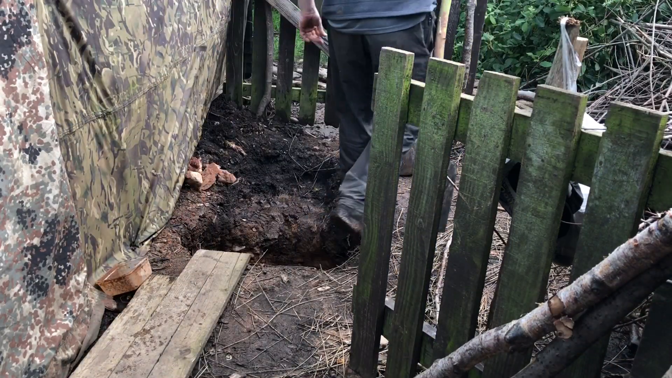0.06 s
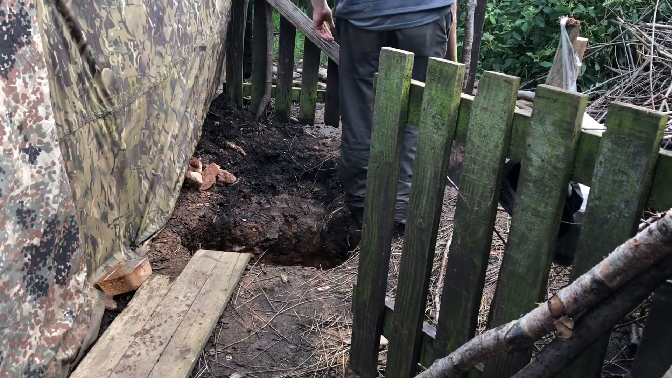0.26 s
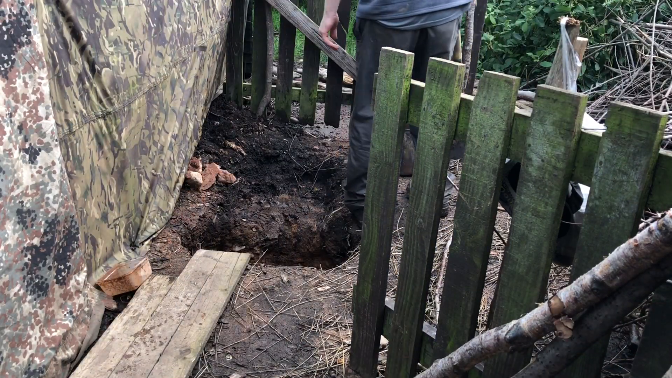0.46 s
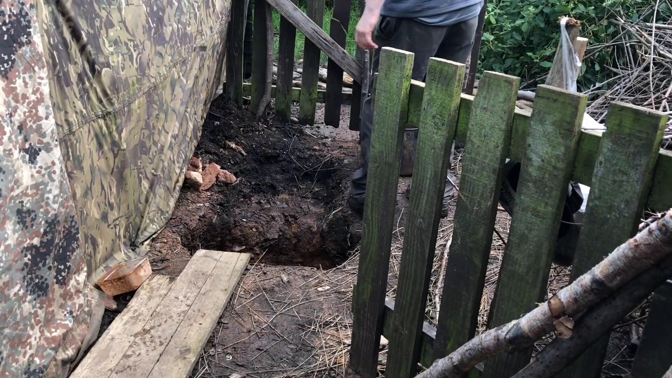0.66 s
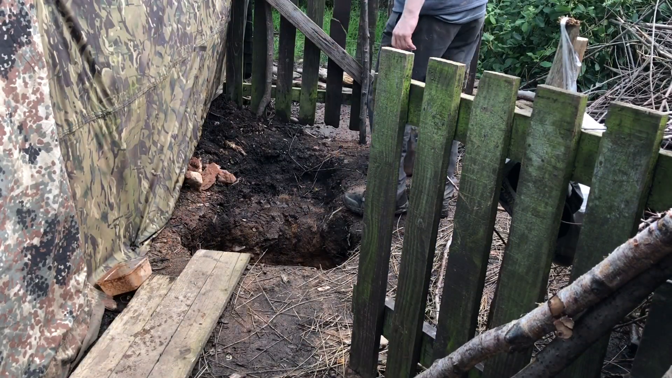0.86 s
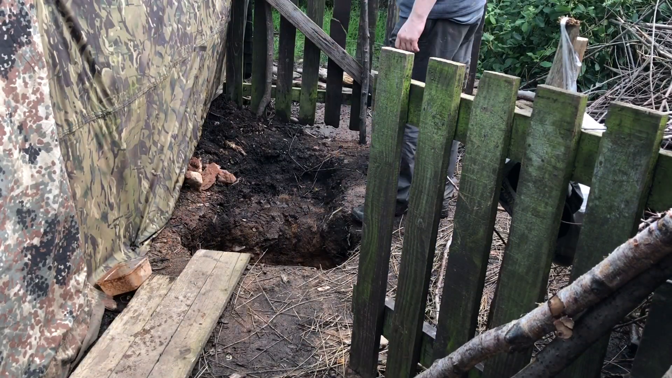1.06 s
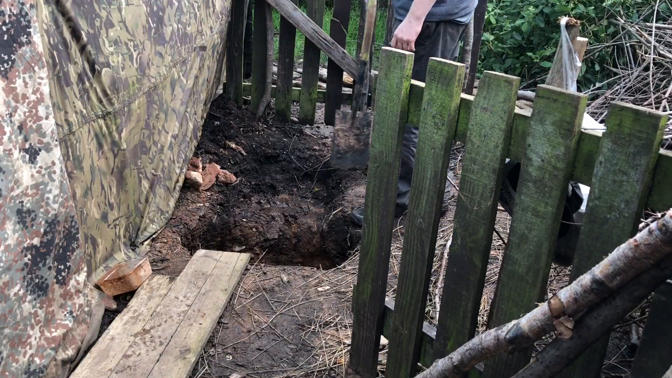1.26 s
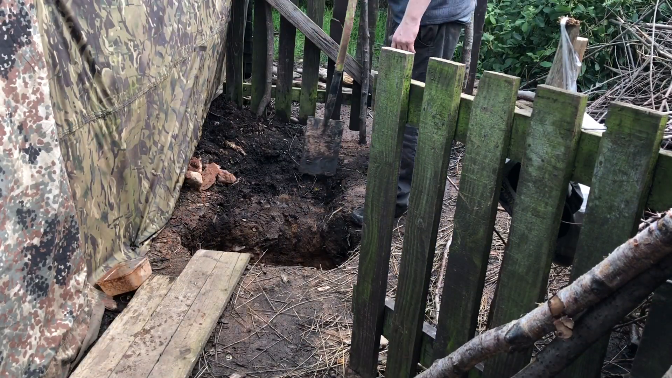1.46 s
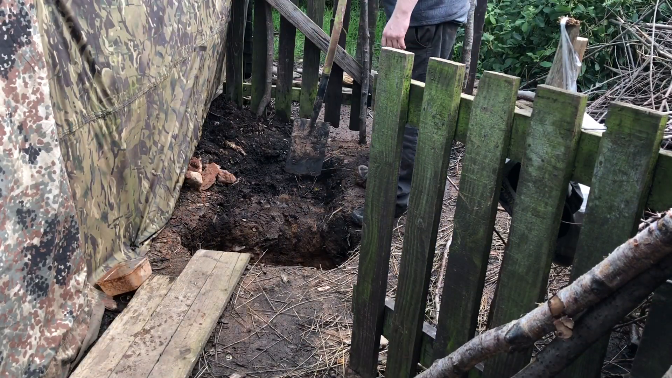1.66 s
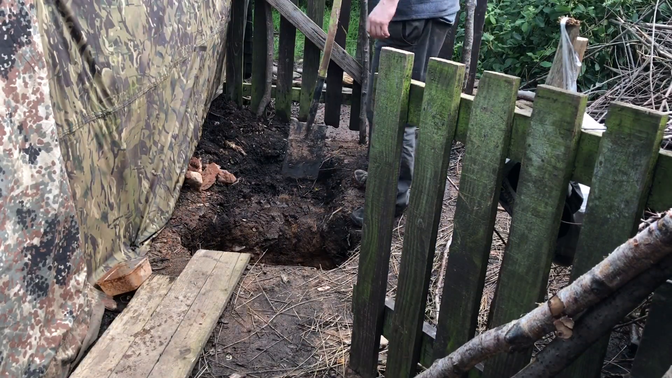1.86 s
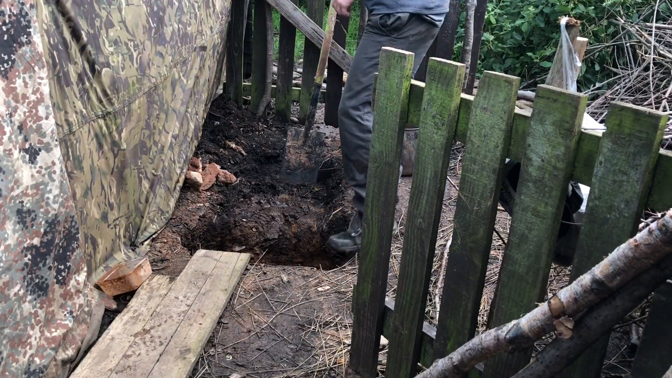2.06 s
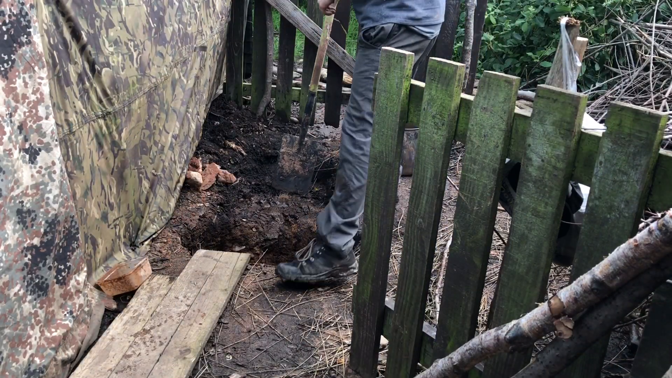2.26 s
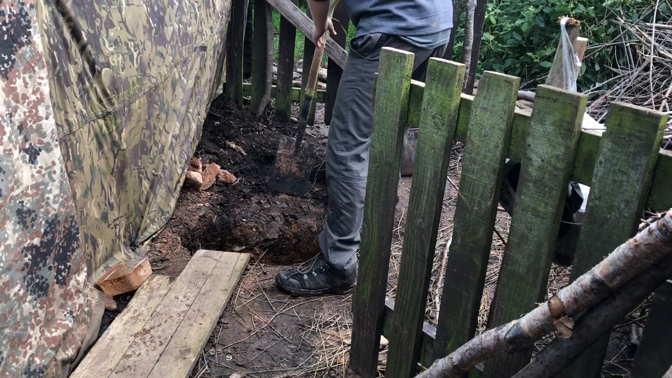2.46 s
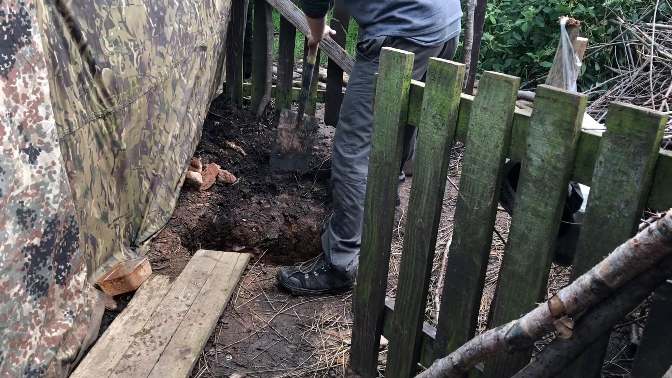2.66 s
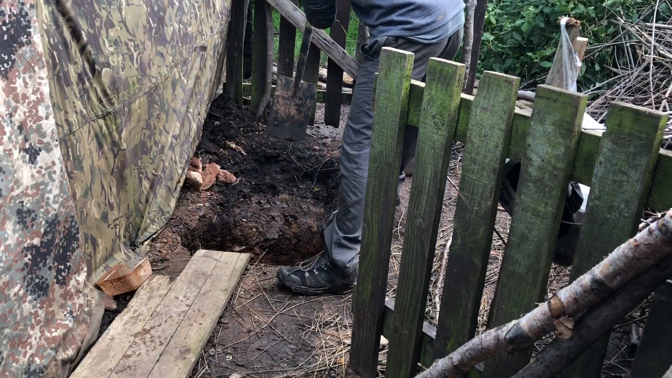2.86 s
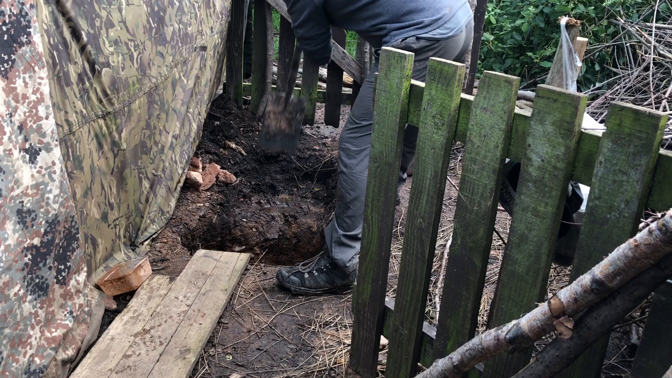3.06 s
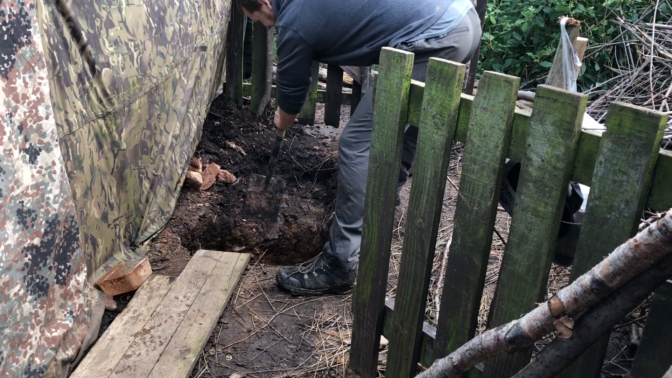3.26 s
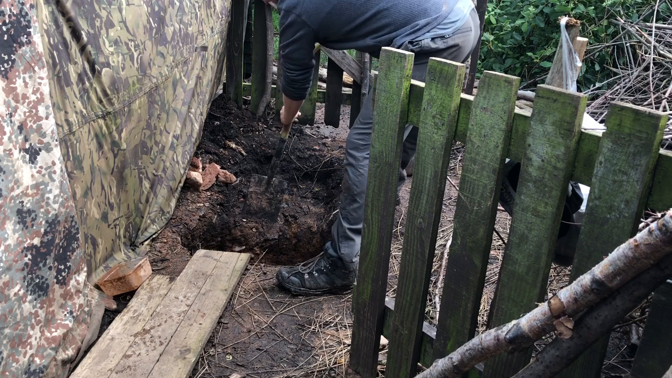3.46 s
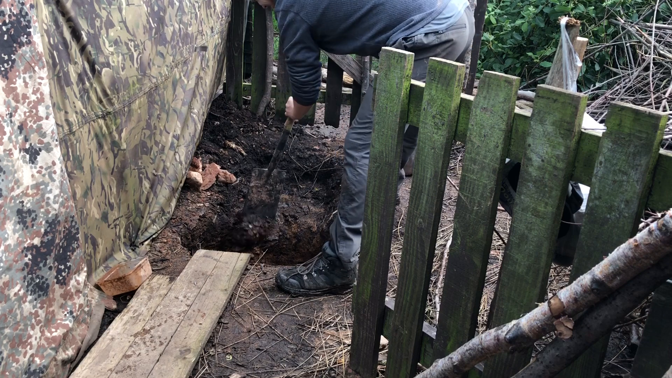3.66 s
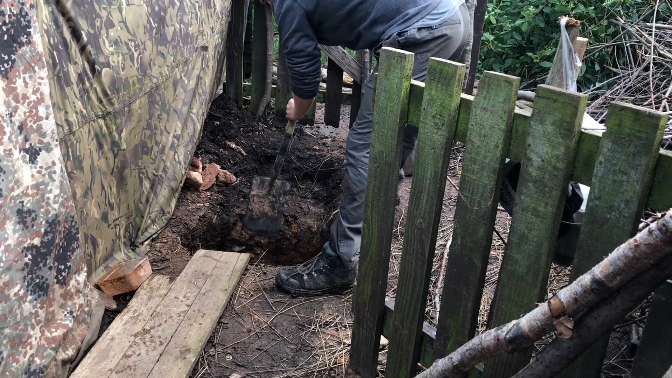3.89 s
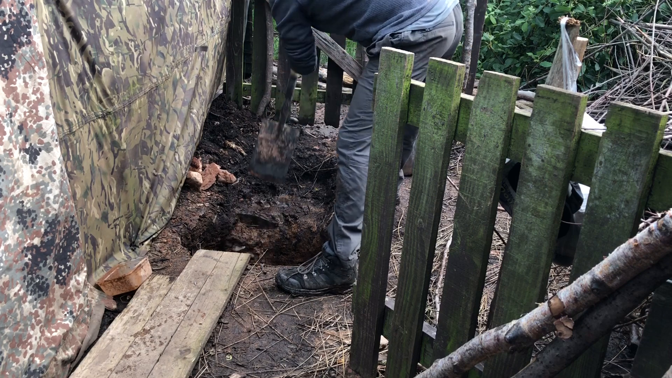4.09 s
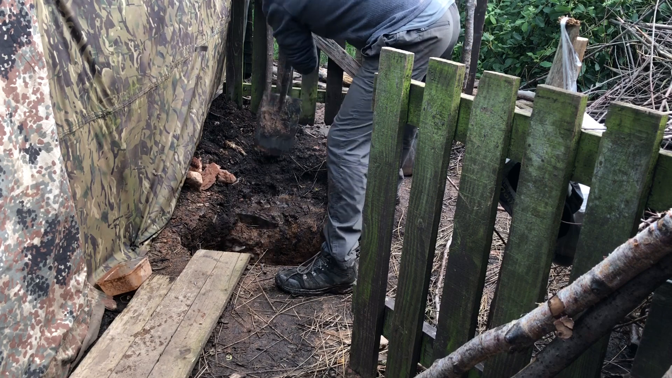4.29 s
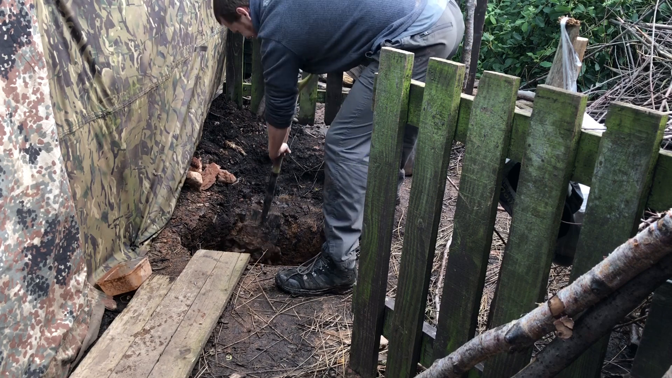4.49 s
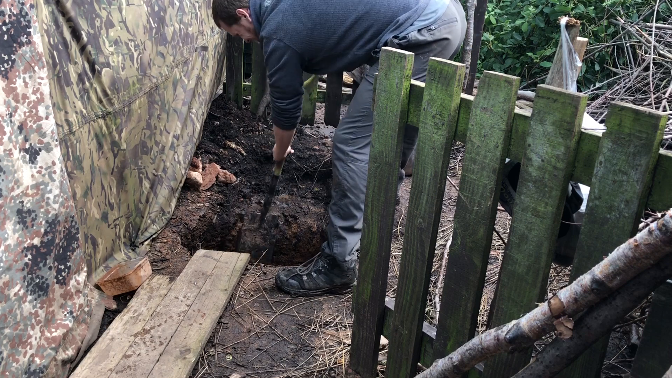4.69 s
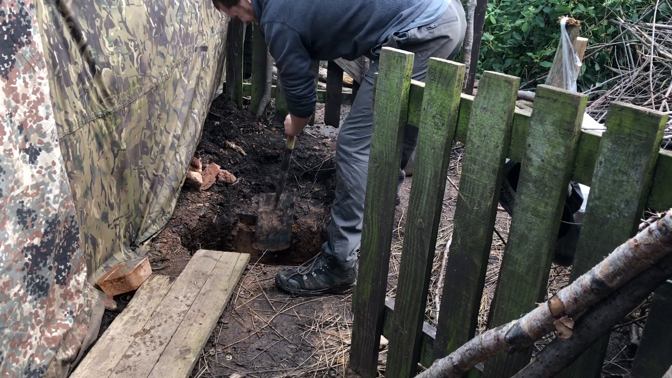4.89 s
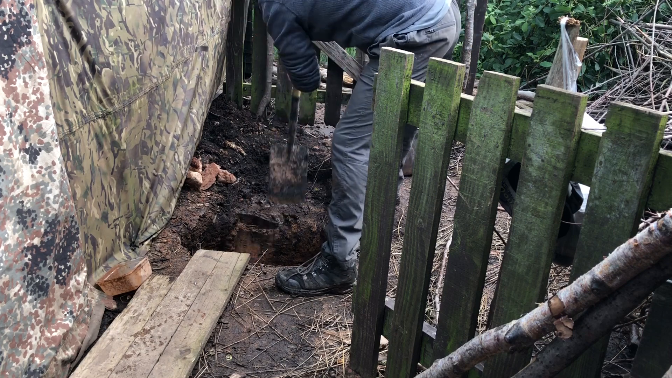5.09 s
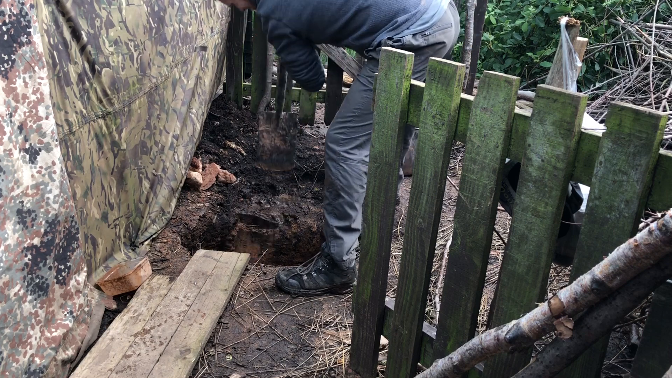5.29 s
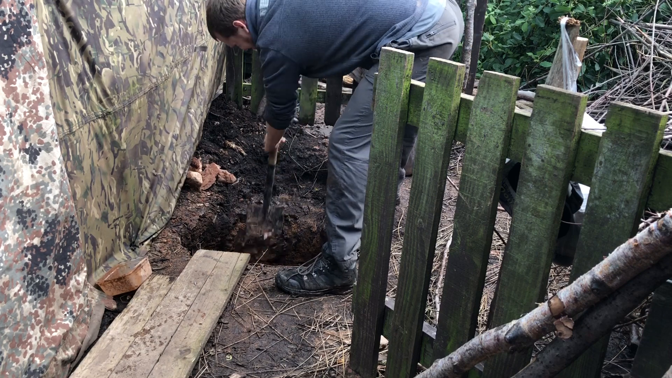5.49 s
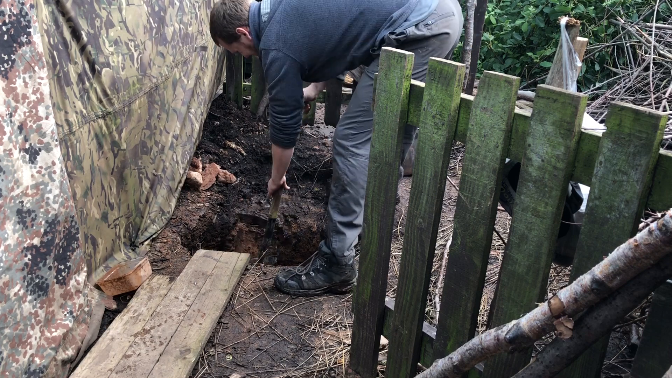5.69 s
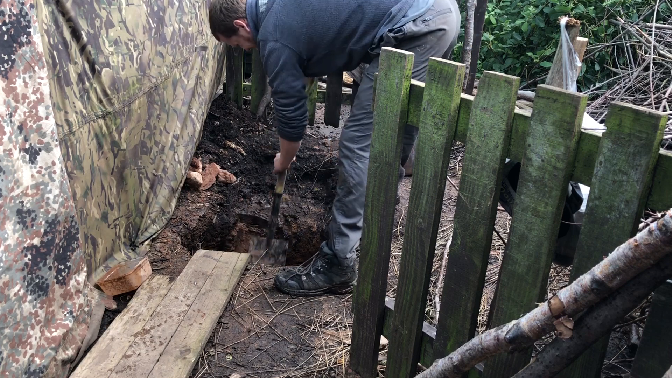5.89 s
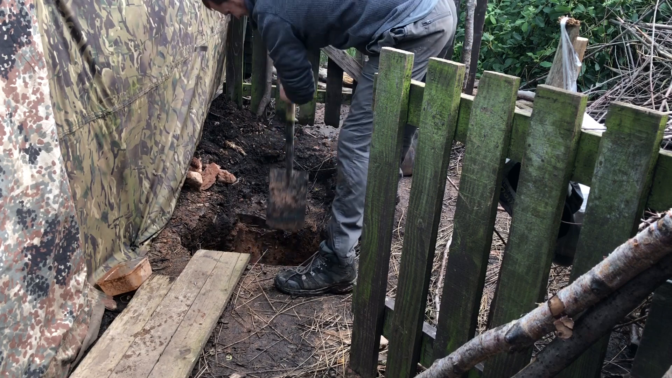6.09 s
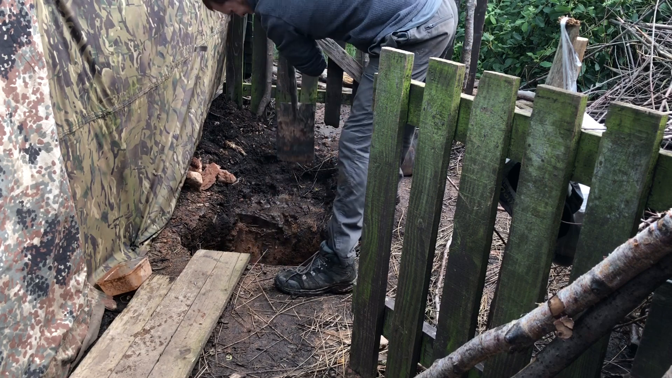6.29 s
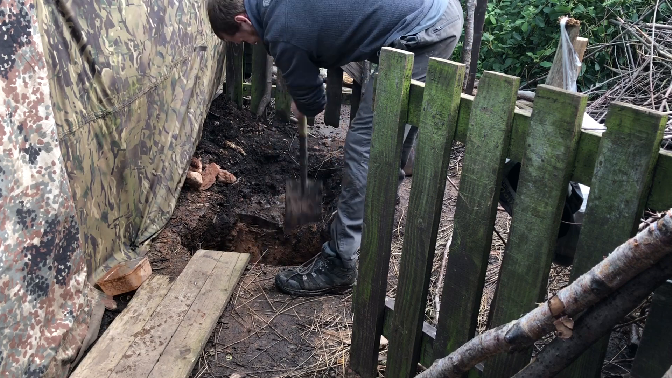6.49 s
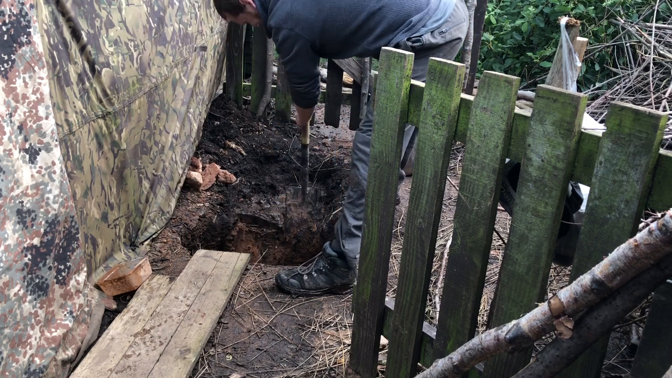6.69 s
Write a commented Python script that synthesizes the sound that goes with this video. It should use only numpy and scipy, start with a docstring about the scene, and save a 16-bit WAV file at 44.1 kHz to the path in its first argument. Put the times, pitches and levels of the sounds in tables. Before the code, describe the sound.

Boots scuff softly on soil and clothes rustle for about three seconds. Then a steel spade chops into wet, gritty clay four times, roughly a second apart. Each bite crunches and squelches, with stones clicking against the blade and a dull thud from the ground. The digging is close by, outdoors, over a faint wash of wind, traffic and a distant idling engine.

```python
"""Spade in wet clay

A spade chops four times into wet, gritty clay in a fenced corner: the soil crunches, air pockets ring,
stones snap and knock the steel, and the ground thuds. Boots, clothes and crumbs rustle in between.
Behind it a far engine idles with a low throb, other machines hum, and wind and traffic make a wash."""
import sys
import numpy as np
from scipy import signal
from scipy.fft import rfft, irfft, next_fast_len
from scipy.io import wavfile
from scipy.ndimage import uniform_filter1d, map_coordinates

SR = 44100
rng = np.random.default_rng(int(sys.argv[2]) if len(sys.argv) > 2 else 0)


def transcribe(signal):
    """Save signal, clipped to [-1, 1], as a 16-bit WAV file at the path in sys.argv[1]."""
    frames = np.atleast_2d(signal).T
    limited = np.clip(frames, -1, 1)
    pcm = np.round(limited * 32767).astype(np.int16)
    wavfile.write(sys.argv[1], SR, pcm)


N = 297234

# modes of the clay-damped steel blade: (frequency [Hz], width [Hz], level [dB])
BLADE_MODES = [(597, 48, -6), (957, 55, -2), (1500, 110, -0.5), (2034, 120, -4), (2780, 370, -8.5),
               (3755, 260, -5.5)]


def amp(db):
    return 10 ** (np.asarray(db) / 20)


def unit(x):
    return x / np.sqrt(np.mean(x ** 2) + 1e-20)


def along(points, hz):
    """Read (frequency [Hz], value) points on a log axis."""
    freqs, values = np.transpose(points)
    return np.interp(np.log(hz + 1), np.log(freqs + 1), values)


def wobble(rate):
    """A smooth random curve, rate knots a second."""
    at = np.arange(0, N + SR, max(1, int(SR / rate / 16)))
    knots = rng.standard_normal(int(N * rate / SR + rate) + 4)
    return np.interp(np.arange(N), at, map_coordinates(knots, [at * rate / SR]))


def filtered(x, response):
    """x through a complex frequency response."""
    size = next_fast_len(N + SR // 2)
    return irfft(rfft(x, size) * response(np.fft.rfftfreq(size, 1 / SR)), size)[..., :N]


def coloured(spectrum, x):
    """x shaped by an EQ curve, at rms 1."""
    return unit(filtered(x, lambda hz: amp(along(spectrum, hz))))


def ring(x, hz, width):
    """x through one resonance, at rms 1."""
    return unit(signal.lfilter(*signal.iirpeak(min(hz, 16000), hz / min(width, 10000), SR), x))


def patchy(size, depth_db, bins, frames):
    """Noise whose gain varies at random over patches of frequency and time."""
    spectra = signal.stft(rng.standard_normal(N + size), nperseg=size)[2]
    patches = uniform_filter1d(rng.standard_normal(spectra.shape), bins, axis=0)
    patches = uniform_filter1d(patches, frames, axis=1)
    return signal.istft(spectra * amp(depth_db * unit(patches)), nperseg=size)[1][:N]


def crunch(spectrum, grain_db, lump_db):
    """Noise broken into tiny grains and lumps, scattered with brief wet resonances."""
    wet = patchy(size=128, depth_db=3.5, bins=2, frames=5)
    return coloured(spectrum, amp(grain_db * wobble(1500) + lump_db * wobble(250)) * wet)


def air():
    """Wind and far traffic: a patchy wash over a lumpy rumble."""
    # colours of the outdoor bed: (frequency [Hz], relative level [dB])
    wash_eq = [(94, -48.5), (160, -13), (264, -6.5), (291, -14), (320, -9), (444, -8.5), (628, -13),
               (1040, -14.5), (2330, -28), (6000, -37.5), (15100, -49), (16000, -45.5)]
    rumble_eq = [(25, -40), (45, -8), (65, -2), (110, -8.5), (135, -5.5), (170, -17), (260, -50.5)]
    wash = amp(-58) * coloured(wash_eq, patchy(size=512, depth_db=1.2, bins=6, frames=14))
    rumble = amp(-52 + 1.1 * wobble(4.7)) * coloured(rumble_eq, rng.standard_normal(N))
    return wash + rumble


def tone(rms_db, turns):
    return np.sqrt(2) * amp(rms_db) * np.cos(2 * np.pi * turns)


def far_engine():
    """Harmonics locked to one slightly uneven shaft beat into a low throb."""
    # engine orders: (multiple of the cycle rate, level [dB])
    orders = {7: -56.5, 10: -56.5, 12: -48.5, 13: -59.5, 14: -48, 18: -66}
    cycle_hz = 8.025
    shaft = rng.random() + np.cumsum(cycle_hz * (1 + 0.0034 * wobble(2.6))) / SR
    return sum(tone(db + 0.8 * wobble(4.5), order * shaft) for order, db in orders.items())


def machine_hums():
    """Machines drone, each wavering on its own in level and pitch."""
    # hum tones: (frequency [Hz], level [dB])
    hums = [(68.5, -53), (89.25, -59), (118.4, -57.5), (126.8, -57.5)]
    return sum(tone(db + 2.5 * wobble(3), rng.random() + hz * np.cumsum(1 + .004 * wobble(3)) / SR)
               for hz, db in hums)


def machine_whine():
    """A whine swells once and fades among three faint tones locked to its pitch."""
    hz, top_db, fade_db, top_s, half_s = 261.5, -61, 9, 2.3, 1.9
    from_top = (np.arange(N) / SR - top_s) / half_s
    swell_db = top_db - fade_db * (1 - np.exp(-from_top ** 4))
    turns = np.cumsum(hz * (1 + .004 * wobble(1))) / SR
    neighbours = sum(tone(-74 + 2 * wobble(2), ratio * turns) for ratio in (.75, 1.25, 1.5))
    return neighbours + tone(swell_db + wobble(6), turns)


def cloth():
    """Clothes whisper as the digger moves, with a flickering fizz on top and crumbs ticking at random."""
    # fader ride of the rustle: (time [s], level [dB])
    ride = [(0, -69), (.3, -70), (.6, -70.5), (.95, -86), (1.25, -70), (1.6, -90), (1.85, -68),
            (2.15, -76.5), (2.45, -64), (2.95, -78), (3.25, -62), (3.45, -69), (3.95, -74), (4.3, -87),
            (4.5, -62), (5.3, -81.5), (5.5, -71.5), (6.25, -79), (6.6, -70)]
    hz, fizz_db = 4400, -6.5
    crumbs_per_s, crumb_db, tick_s = 40, 3, 0.0025
    level_db = np.interp(np.arange(N) / SR, *np.transpose(ride))
    grain = amp(2.2 * wobble(270)) * rng.standard_normal(N)
    whisper = amp(1.5 * wobble(24)) * ring(ring(grain, hz, width=2.1 * hz), hz, width=2.8 * hz)
    crumbs = (rng.random(N) < crumbs_per_s / SR) * amp(crumb_db + 4.9 * rng.standard_normal(N))
    ticks = signal.lfilter([1], [1, -np.exp(-1 / (tick_s * SR))], crumbs)
    fizz = ring(rng.standard_normal(N), 12500, width=10000) * (amp(fizz_db + 3.5 * wobble(7.9)) + ticks)
    return amp(level_db) * (whisper + fizz)


def scuffs():
    """Boots and the sliding blade rub on soil: bands of grainy noise that swell and fade."""
    # rubs: (time of peak [s], level [dB], half length [s], centre [Hz])
    rubs = [(0.017, -62, 0.048, 5900), (0.425, -57.5, 0.02, 3000), (0.501, -55, 0.029, 3250),
            (0.52, -56, 0.037, 620), (0.554, -60, 0.019, 1500), (0.675, -55, 0.0076, 5800),
            (0.707, -54.5, 0.027, 4600), (0.768, -54.5, 0.024, 3000), (1.133, -62.5, 0.032, 4960),
            (1.326, -57.5, 0.082, 5300), (1.953, -52.5, 0.024, 9000), (1.998, -49.5, 0.019, 5200),
            (2.646, -59.5, 0.035, 2860), (2.681, -55, 0.012, 1400), (2.8, -62, 0.06, 6000),
            (3.69, -60, 0.073, 4900), (3.691, -46, 0.014, 3830), (4.031, -50.5, 0.012, 3990),
            (4.089, -56, 0.057, 3000), (4.795, -58, 0.052, 5350), (4.951, -36.5, 0.012, 3600),
            (4.991, -38, 0.01, 4800), (5.011, -36.5, 0.015, 3670), (5.05, -48, 0.017, 3020)]
    out, t = np.zeros(N + SR), np.arange(-SR // 4, SR // 4) / SR
    grain = crunch([(200, 0), (16000, 0.0025)], grain_db=-1.5, lump_db=2.0)
    grain = np.pad(grain, (SR // 2, SR), "wrap")
    lean = np.where(t < 0, .75, 1.3)  # quicker to start than to fade
    for s, db, half_s, hz in rubs:
        at = round(s * SR) + SR // 4
        band = ring(grain[at:][:len(t)], hz, width=hz * hz / 1500 + 300)
        rub = ring(band, hz, width=2.1 * hz)
        fizz = unit(np.diff(grain[at:][:len(t) + 1]))  # fine grit brightens every rub
        swell = amp(db) * np.exp(-np.abs(t / half_s / lean) ** 1.2)
        out[at:][:len(t)] += swell * (rub + hz / 11000 * fizz)
    return out[SR // 2:][:N]


def fence_reverb(x):
    """Fences and the hole answer with a short tail whose treble dies first."""
    # reverb decay: (frequency [Hz], t60 [s])
    decay = [(200, .2), (2000, .17), (12000, .11)]
    hz, t, spectra = signal.stft(rng.standard_normal(SR // 2), SR, nperseg=256)
    tail = signal.istft(spectra * amp(-60 * t / along(decay, hz)[:, None]), SR, nperseg=256)[1]
    predelayed = np.pad(x, (200, 0))
    return signal.fftconvolve(predelayed, tail / np.linalg.norm(tail))[:N]


def thuds():
    """As the blade stops, ground, clod and shaft give short low rings; the deeper, the later they build."""
    # blade stops: (time [s], level [dB], ground boost [dB], ground delay [s])
    stops = [(3.282, -26.5, -1.5, .018), (4.545, -30, -1.5, .03), (5.557, -25.5, 3.5, .004),
             (6.609, -36, 7, .035)]
    # low modes, ground first, then clod and shaft: (frequency [Hz], level [dB], t60 [s])
    modes = [(102.4, 5.5, .14), (194, -3, .12), (299, -4, 0.092), (457, -6, 0.17)]
    out, t = np.zeros(N + SR), np.arange(SR // 4) / SR
    for s, db, ground_db, delay_s in stops:
        for k, (hz, mode_db, t60) in enumerate(modes):
            is_ground = k == 0
            turns = hz * t + .005 * np.cumsum(rng.standard_normal(len(t)))  # loose soil smears the pitch
            build = (1 - np.exp(-t * hz / 0.48)) ** 2
            decay = amp(db + mode_db + ground_db * is_ground - 60 * t / t60)
            at = round((s + delay_s * is_ground) * SR)
            out[at:][:len(t)] += build * decay * np.sin(2 * np.pi * turns)
    return out[:N]


def cracks():
    """Stones snap on the edge and crumbs land: a one-cycle click and a tiny burst of noise."""
    # snaps and ticks: (time [s], level [dB], centre [Hz])
    snaps = [(2.116, -44.5, 12000), (2.299, -50, 11000), (2.464, -33, 11400), (3.28, -2, 2833),
             (3.497, -47, 3500), (3.591, -49.5, 3780), (3.6912, -32.5, 3870), (4.026, -38, 10460),
             (4.171, -42.5, 12030), (4.5394, 3, 8500), (4.552, -7, 5000), (4.653, -33.5, 7000),
             (4.693, -43.5, 1400), (4.7057, -35.5, 7000), (4.7305, -46, 4100), (4.939, -36, 2950),
             (5.533, -39, 2520), (5.5473, -4, 6000), (5.555, -4, 2800), (5.572, -20.5, 3980),
             (5.6605, -18, 2200), (5.7437, -22.5, 5970), (5.771, -36, 7900), (5.805, -29, 2600),
             (6.713, -44, 11000)]
    out, t = np.zeros(N + SR), np.arange(SR // 20) / SR
    t60, attack_s, trim_db = 0.017, 0.0004, -6.5
    envelope = amp(-60 * t / t60) * (1 - np.exp(-t / attack_s))
    for s, db, hz in snaps:
        burst = envelope * ring(rng.standard_normal(len(t)), hz, width=0.75 * hz)
        click = amp(5) * np.exp(-2 * hz * t) * np.cos(2 * np.pi * hz * t)
        out[round(s * SR):][:len(t)] += amp(db + trim_db) * (click + burst)
    return out[:N]


def stone_knocks():
    """A stone sets all the blade's modes ringing; clinging clay shifts their pitch and colour."""
    # blows on the steel: (time [s], level [dB], second mode [Hz], tilt [dB/octave])
    blows = [(3.2799, -18, 985, 6), (4.0345, -35, 1000, 2), (4.5396, -25, 966, 7.5), (4.5582, -13, 909, -1),
             (5.5552, -10.5, 898, 2.5), (5.6635, -29, 1080, 2), (6.6118, -24.5, 1000, -0.5)]
    out, t = np.zeros(N + SR), np.arange(SR // 8) / SR
    hz, width, mode_db = np.transpose(BLADE_MODES)[:, :, None]
    ratio = hz / hz[1]
    for s, db, second_hz, tilt_db in blows:
        strike_db = db + mode_db + tilt_db * np.log2(ratio) + rng.normal(0, 2.2, hz.shape)
        envelopes = amp(strike_db) * np.sqrt(width / width[1]) * np.exp(-np.pi * width * t)
        partials = envelopes * np.sin(2 * np.pi * ratio * second_hz * t)
        out[round(s * SR):][:len(t)] += partials.sum(axis=0)
    return out[:N]


def blade_ring(x):
    """Driven by x, the damped steel rings at its modes, alternating in polarity."""
    return filtered(x, lambda f: sum((-1) ** k * amp(db) * 1j * f * width / (hz**2 - f**2 + 1j * f * width)
                                     for k, (hz, width, db) in enumerate(BLADE_MODES)))


def blade_dispersion(x):
    """Low tones leave the blade later and radiate poorly, so each blow sweeps downward."""
    lag_cycles, thin_hz = 2.2, 140

    def response(hz):
        lag = np.exp(-2j * np.pi * lag_cycles * np.log(hz + thin_hz))
        return lag * hz ** 2 / (hz ** 2 + thin_hz ** 2)
    return filtered(x, response)


def spade_bites():
    """Each bite crunches and dies away, hiss first; an air pocket rings and rises in pitch as it closes."""
    # bites into clay: (time [s], level [dB], grit t60 [s], pocket pitch [Hz], pocket over wet share [dB])
    bites = [(3.278, -6.5, 0.043, 1550, 9), (3.284, -6.5, 0.068, 580, 8.5), (3.3108, -34, 0.15, 458, 4),
             (4.0301, -27.5, 0.12, 1000, 7), (4.057, -41, 0.21, 2900, 8), (4.539, -11, 0.044, 3800, 10),
             (4.5492, -12.5, 0.12, 3700, 0), (4.557, -11, 0.069, 910, 5), (4.5769, -22, 0.23, 1170, 1),
             (4.6025, -25, 0.17, 1350, 10), (4.729, -41, 0.17, 955, 10), (5.546, -26, 0.096, 3100, 5),
             (5.5565, -9.5, 0.055, 680, 9), (5.567, -14.5, 0.13, 800, 4.5), (5.601, -17, 0.076, 1700, 6.5),
             (5.6124, -20.5, 0.2, 1810, 4), (5.626, -23, 0.22, 2000, 7), (5.663, -25.5, 0.054, 1700, 9),
             (5.744, -25.5, 0.089, 2400, 10), (5.76, -27.5, 0.1, 1230, 5.5), (5.7703, -30, 0.11, 1620, 9),
             (5.804, -38, 0.31, 448, 1), (6.6022, -15, 0.085, 1990, 3.5), (6.6112, -15.5, 0.068, 1520, 1.5),
             (6.6236, -21.5, 0.097, 570, 3)]
    # strokes, each a run of bites: (first contact [s], wet share [dB], hiss share [dB])
    strokes = [(3.28, -12, -12), (4.0294, -6.5, 1.5), (4.5394, -6.5, -6.5), (5.545, -4, -13),
               (5.743, -7.5, -15.5), (6.6, -10.5, 0)]
    # colours of wet clay, grit and hiss: (frequency [Hz], relative level [dB])
    wet_eq = [(80, -50.5), (280, -25), (520, -1.5), (900, -2.5), (2000, -2), (3500, -23.5)]
    grit_eq = [(50, -39), (200, -11.5), (1200, -9.5), (2000, -6), (4000, -7.5), (7000, -10), (10000, -17)]
    hiss_eq = [(4000, -26.5), (7000, -1.5), (11000, -0.5), (16000, -1)]
    attack_s, sink_s, close_s = 0.0009, 0.002, .04
    surface_db, trim_db, steel_db = -7.5, -7.0, -9.5
    t, energy, pockets = np.arange(SR // 3) / SR, np.zeros((3, N + SR)), np.zeros(N + SR)
    closing = np.clip(t / close_s, 0, 1)
    for s, db, t60, hz, pocket_db in bites:
        at = round(s * SR)
        contact_s, wet_db, hiss_db = [row for row in strokes if row[0] < s + .005][-1]
        wet_db += surface_db * np.exp(-max(s - contact_s, 0) / sink_s)  # wetter as the blade sinks in
        shares_db = np.array([[0], [wet_db], [hiss_db]])  # rows: grit, wet, hiss
        t60s = t60 * np.array([[1], [1.2], [.8]])
        envelopes = amp(db + trim_db + shares_db - 60 * t / t60s) * (1 - np.exp(-t / attack_s))
        energy[:, at:][:, :len(t)] += envelopes ** 2
        noise, width = rng.standard_normal(len(t)), .12 * hz
        pocket = (1 - closing) * ring(noise, hz, width) + closing * ring(noise, 1.12 * hz, width)
        pockets[at:][:len(t)] += amp(pocket_db - 45 * t / t60s[1]) * envelopes[1] * pocket
    grit_gain, wet_gain, hiss_gain = np.sqrt(energy[:, :N])
    squelch = wet_gain * crunch(wet_eq, grain_db=3.0, lump_db=3.0)
    edge = grit_gain * crunch(grit_eq, grain_db=2.0, lump_db=1.0) + cracks()
    hiss = hiss_gain * crunch(hiss_eq, grain_db=1.0, lump_db=4.0)
    return edge + squelch + pockets[:N] + hiss + amp(steel_db) * blade_ring(squelch + edge)


def scene():
    """Mono mix: the spade and its reverb over the digger's movements and the outdoor bed."""
    spade = blade_dispersion(spade_bites() + stone_knocks()) + thuds()
    digging = spade + amp(-13.5) * fence_reverb(spade) + scuffs() + cloth()
    return (digging + far_engine() + machine_hums() + machine_whine() + air())[None]


def record(dry):
    """The microphone rounds off the loudest peaks and cuts the deepest bass and the highest treble."""
    ceiling, low_cut_hz, top_hz = .98, 45, 15850
    soft = dry / (1 + np.abs(dry / ceiling) ** 5) ** (1 / 5)
    return filtered(soft, lambda hz: (1j * hz / (1j * hz + low_cut_hz)) ** 2 / (1 + (hz / top_hz) ** 120))


dry = scene()
out = record(dry)
transcribe(out)
```